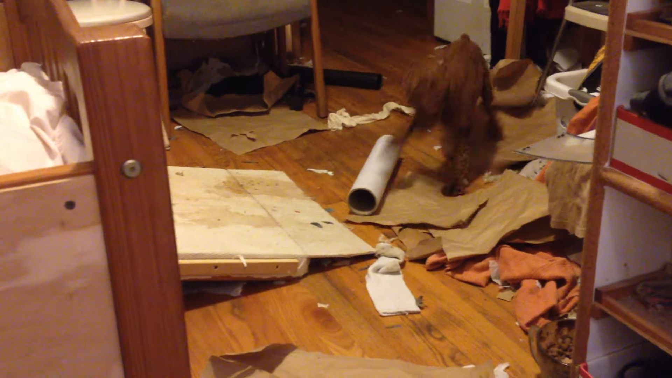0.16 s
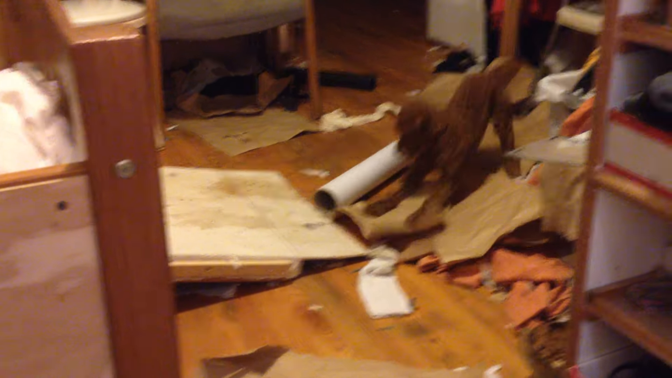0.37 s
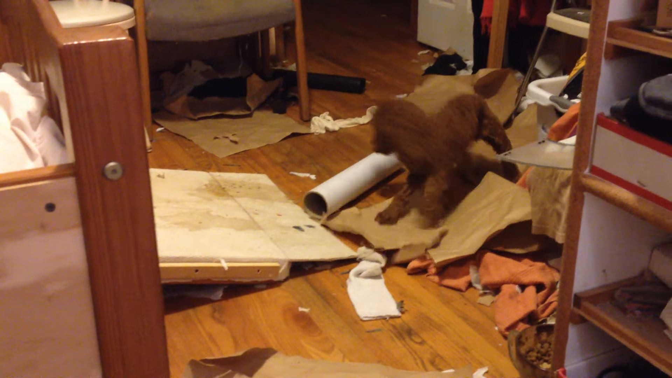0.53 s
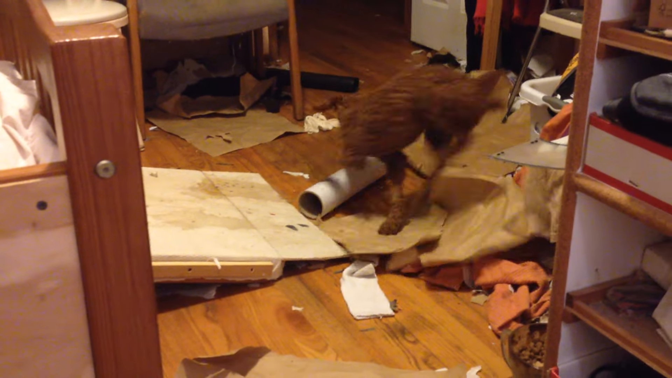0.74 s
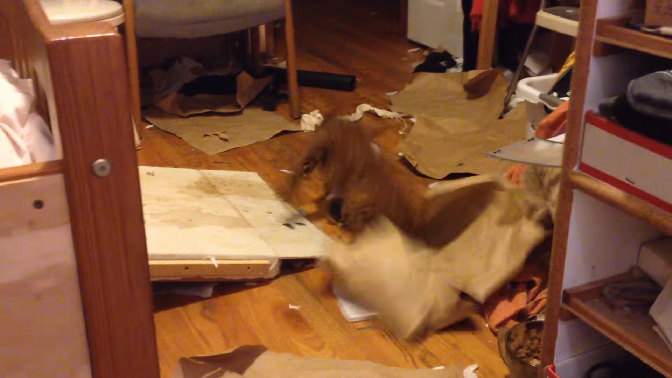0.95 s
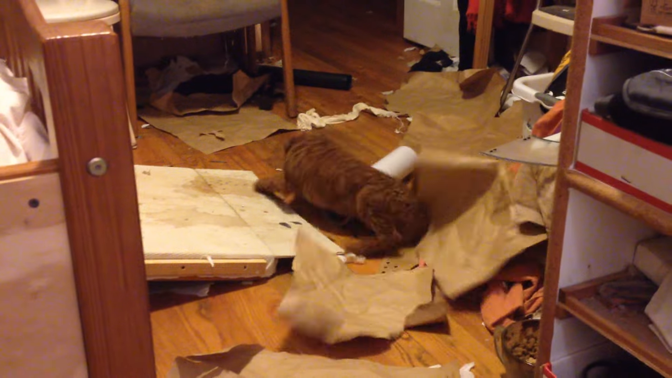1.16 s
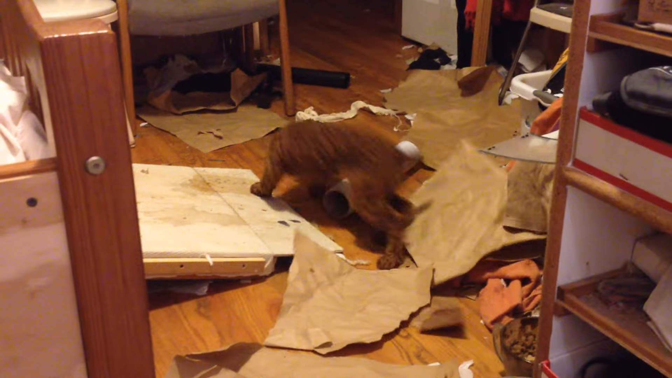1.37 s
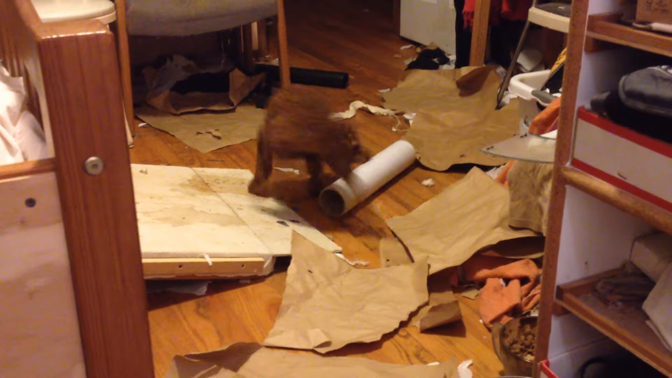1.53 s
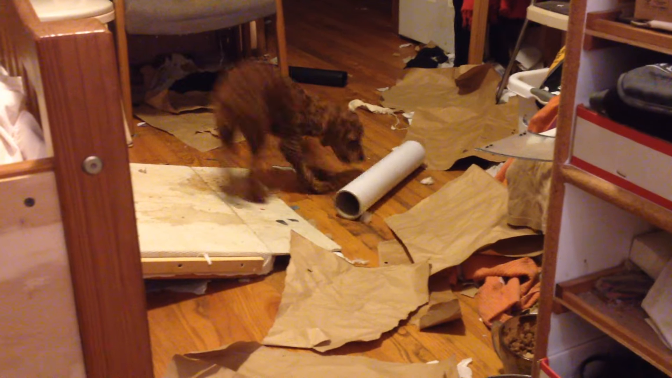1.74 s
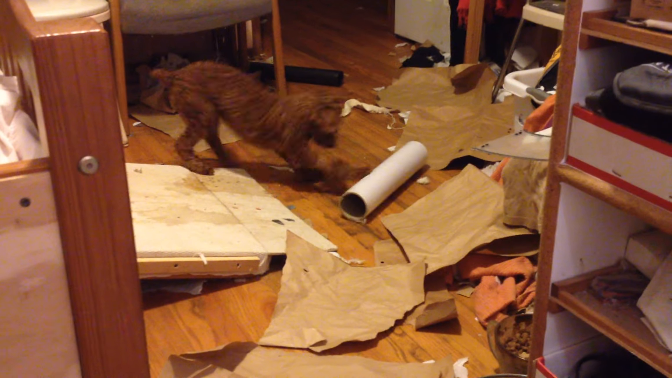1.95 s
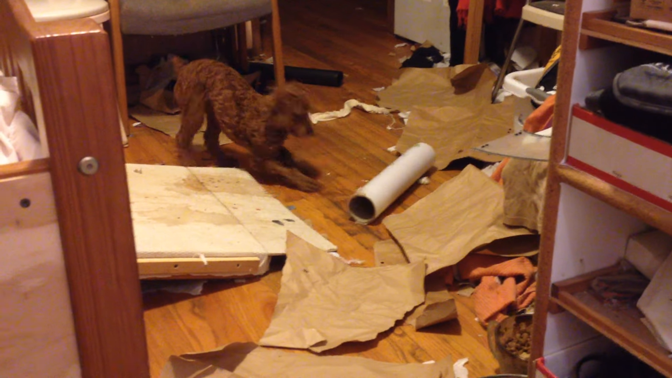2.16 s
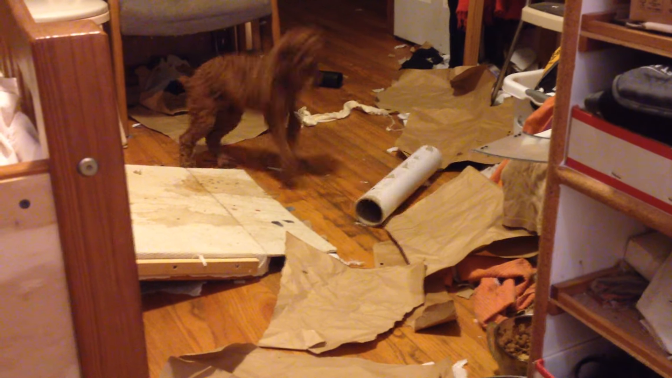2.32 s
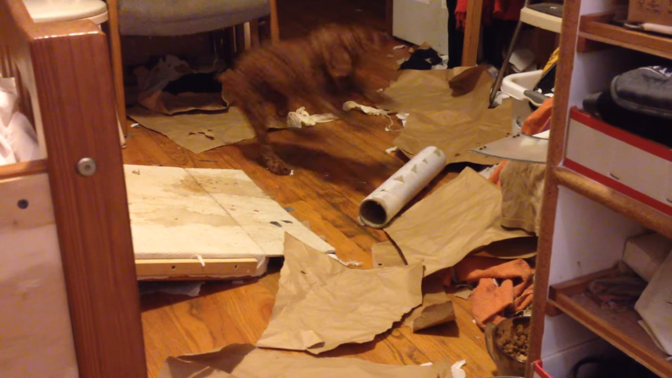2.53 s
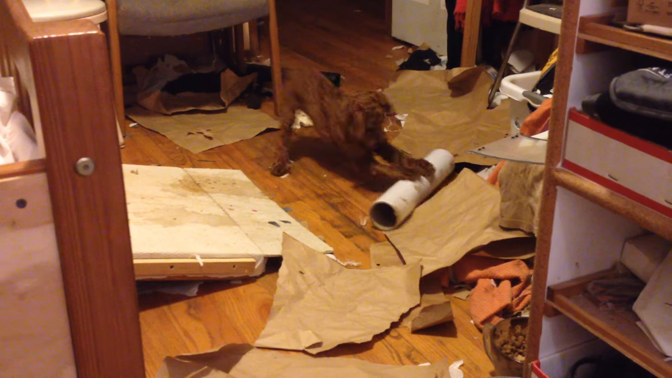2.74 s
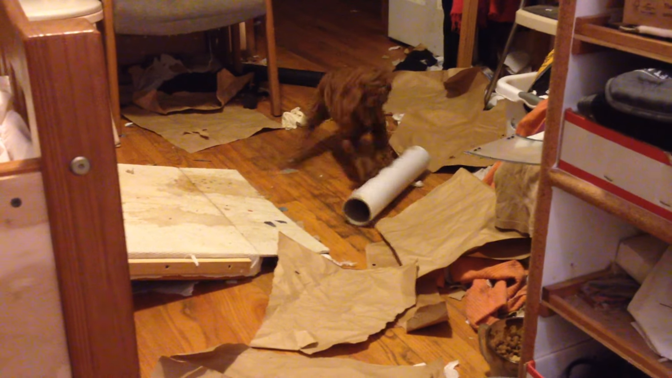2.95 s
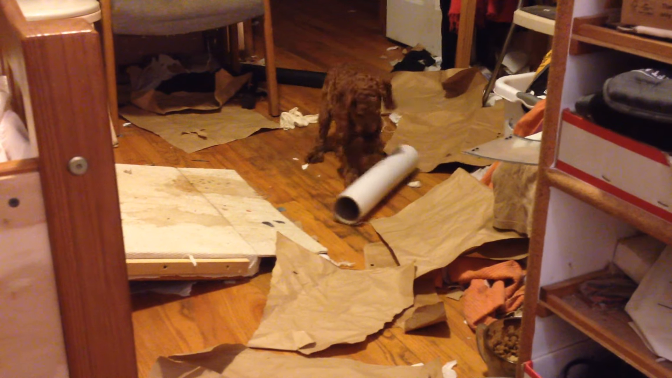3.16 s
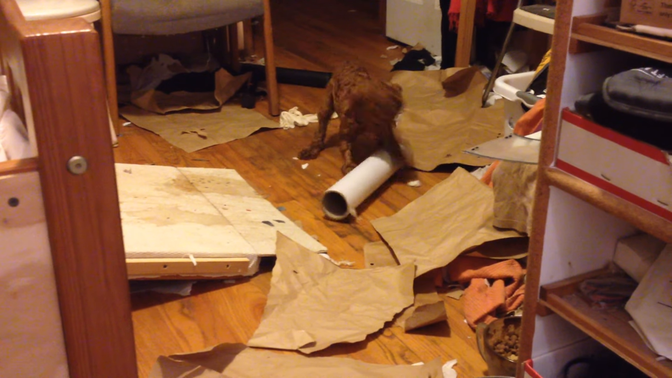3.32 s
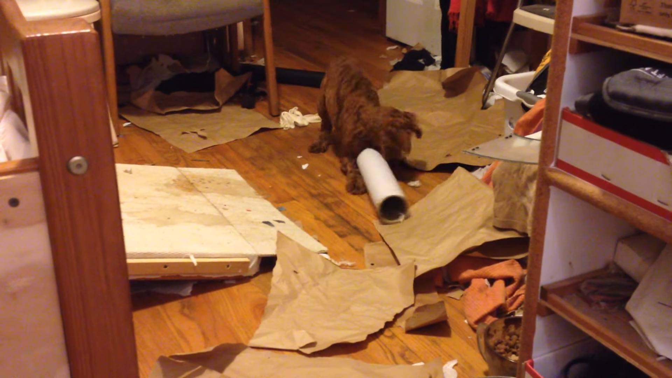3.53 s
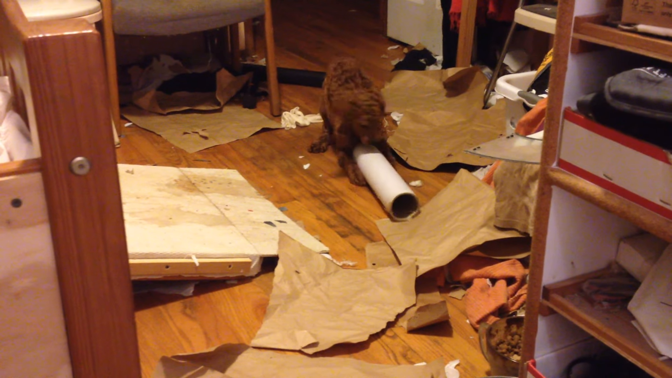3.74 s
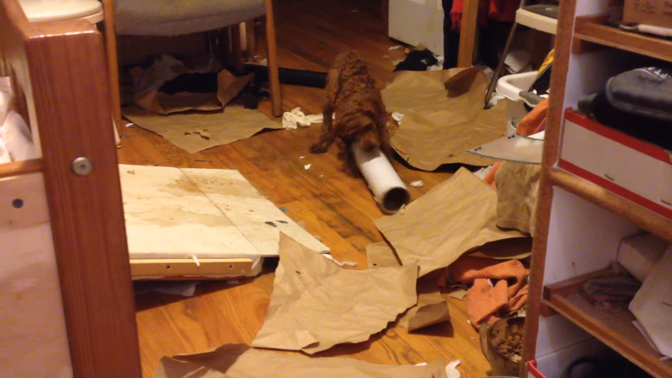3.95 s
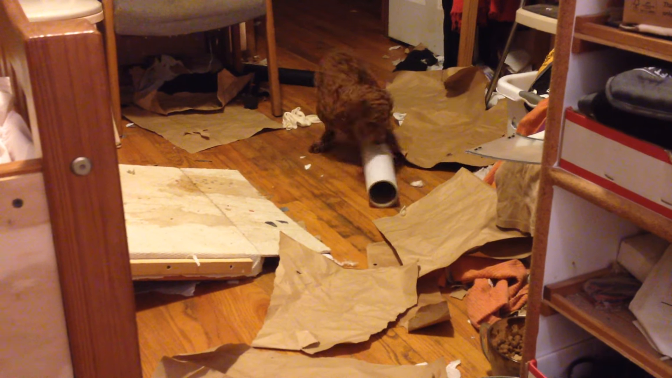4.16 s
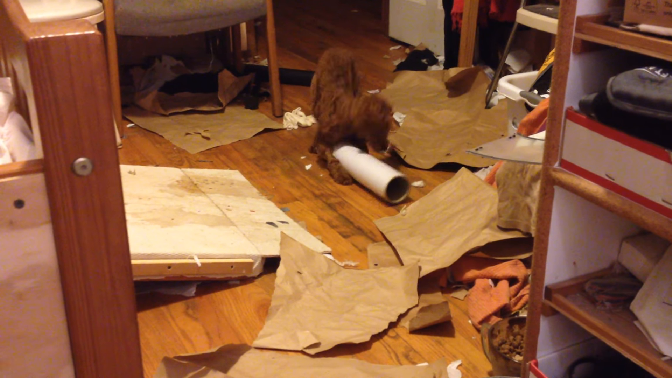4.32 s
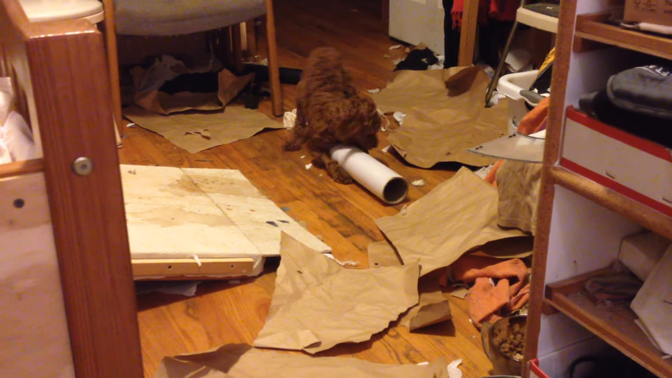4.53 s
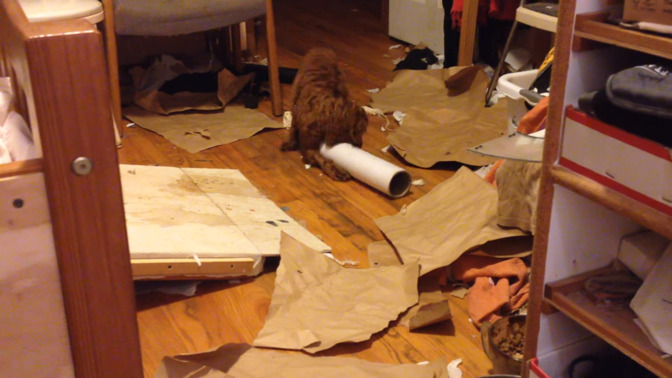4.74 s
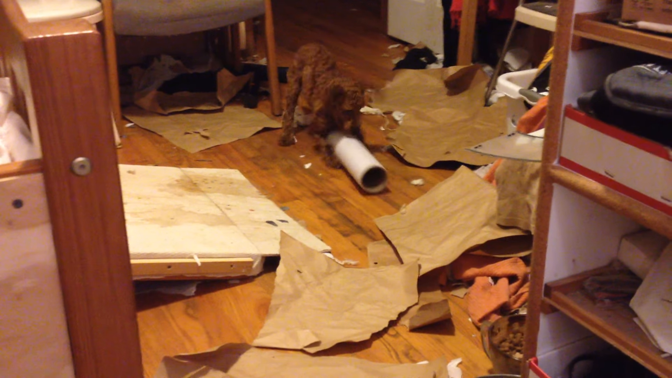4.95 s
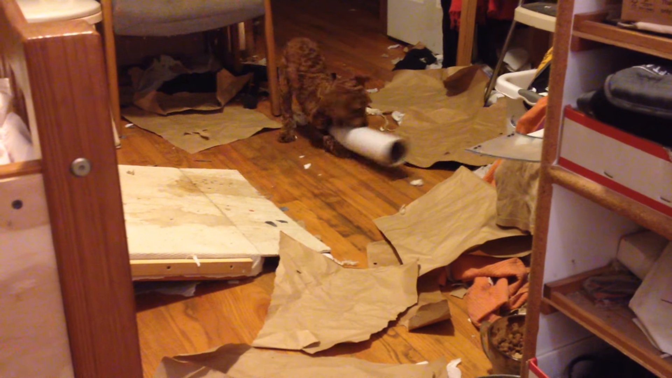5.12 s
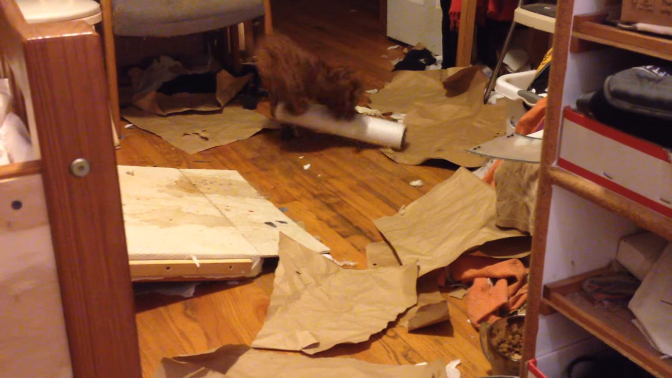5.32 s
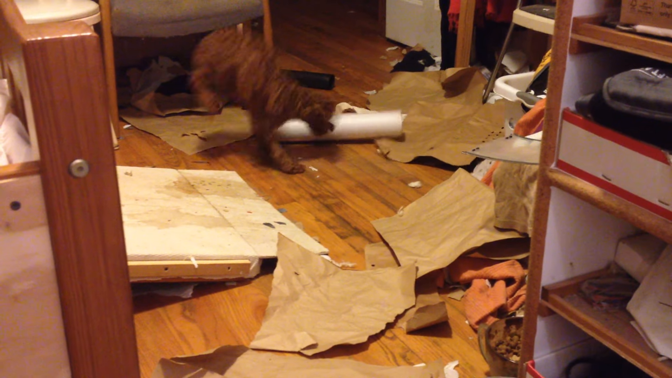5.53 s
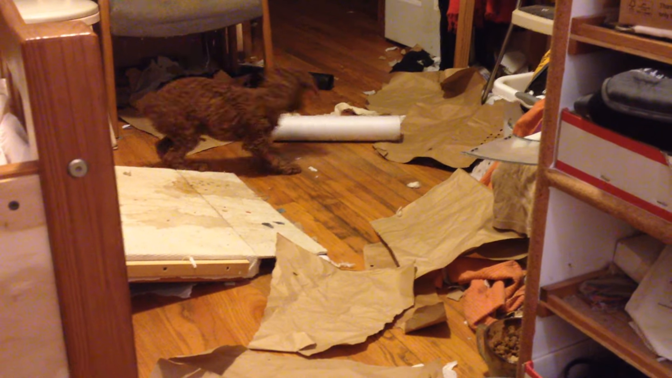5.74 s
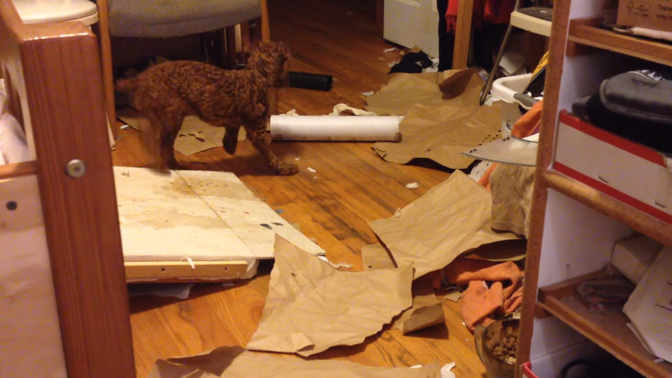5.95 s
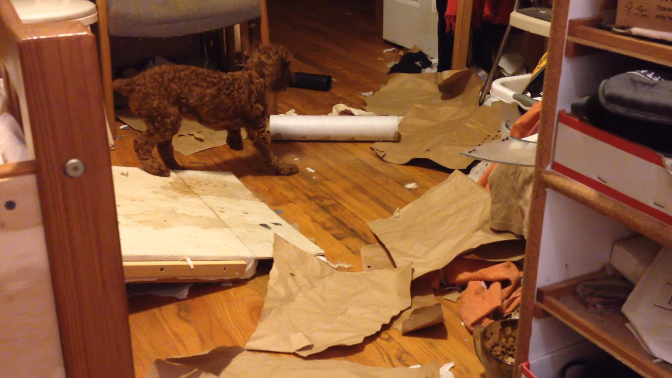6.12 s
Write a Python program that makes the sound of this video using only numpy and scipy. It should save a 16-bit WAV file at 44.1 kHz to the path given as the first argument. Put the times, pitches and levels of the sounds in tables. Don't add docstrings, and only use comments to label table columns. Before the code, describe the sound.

Crisp paper rustling and snapping under paws fades to light ticks, then a cardboard tube bumps, scrapes and finally bangs hard on a wood floor.

```python
import sys
import numpy as np
from scipy import signal
from scipy.fft import rfft, irfft
from scipy.io import wavfile
from scipy.ndimage import uniform_filter1d

SR = 44100
rng = np.random.default_rng(int(sys.argv[2]) if len(sys.argv) > 2 else 0)


def wav_out(sig):
    wavfile.write(sys.argv[1], SR, np.round(np.clip(np.atleast_2d(sig).T, -1, 1) * 32767).astype(np.int16))


def gain_from_db(level_db):
    decades = np.asarray(level_db, float) / 20
    return 10 ** decades


N = 272538
TUBE_FROM_S = 2.6

# hz, level_db (per Hz)
PAPER = [(180, -8), (300, 0), (545, -9), (665, -2), (2230, -4.5), (4470, -5.5), (5100, -9.5), (6650, -4),
         (10800, -7.5), (15700, -12)]
# pitch_hz, level_db, t60_s
BOARDS = [(152.4, -9.5, 0.29), (190, -10, 0.32), (215, -1, 0.12), (250.2, -3.5, 0.2), (290.6, -3.5, 0.22),
          (345, -1.5, 0.11), (420, -8.5, 0.052), (482.8, -10.5, 0.18), (572, -13.5, 0.086)]


def evened(x):
    return x / np.sqrt(np.mean(x ** 2) + 1e-20)


def read(points, hz):
    f, value = np.transpose(points)
    return np.interp(np.log(hz + 1), np.log(f + 1), value)


def add(mix, s, sound):
    part = mix[max(round(s * SR), 0):][:len(sound)]
    part += sound[:len(part)]


def coloured(x, gain_db):
    hz = np.fft.rfftfreq(len(x), 1 / SR)
    return irfft(rfft(x) * gain_from_db(gain_db(hz)), len(x))


def shelves(hz):
    body = 1 / (1 + (hz / 1400) ** 6)
    fizz = 1 / (1 + (5000 / (hz + 1)) ** 5)
    return body, fizz


def hush():
    # hz, level_db (per Hz)
    air_spectrum = [(18, -52), (30, 4), (70, 7), (140, 3), (278, 4), (500, 2.5), (773, -8), (2870, -18),
                    (10300, -22), (14600, -10), (15700, -16)]
    # pitch_hz, level_db (rms)
    hum_tones = [(119, -81)]
    t = np.arange(N) / SR
    air = evened(coloured(rng.standard_normal(N), lambda hz: read(air_spectrum, hz)))
    hum = sum(gain_from_db(db + 6) * np.sin(2 * np.pi * f * t) for f, db in hum_tones)
    return gain_from_db(-72.5) * air + hum


def room(x):
    # hz, t60_s
    room_decay = [(200, 0.38), (1000, 0.12), (3000, 0.11), (8000, 0.22)]
    taps = np.zeros(SR // 2)
    at = np.arange(130, SR // 2 - 20, 20)
    taps[at + rng.integers(0, 20, len(at))] = rng.choice([-1., 1.], len(at))
    hz, t, z = signal.stft(taps, SR, nperseg=256)
    fade = gain_from_db(-60 * t / read(room_decay, hz)[:, None])
    tail = signal.istft(z * fade, SR, nperseg=256)[1]
    return signal.fftconvolve(x, tail / np.linalg.norm(tail))[:N]


def boom(peak_db, hz):
    t = np.arange(12000) / SR
    swell = 1 - np.exp(-t / 0.018)
    return gain_from_db(peak_db + 10.0) * np.sin(2 * np.pi * hz * t) * swell * gain_from_db(-60 * t / 0.42)


def floor_booms(low):
    # start_s, peak_db, pitch_hz
    landings = [
        (1.023, -65, 96.9),
        (1.672, -55, 89),
        (1.766, -73, 98),
        (2.704, -48.5, 105.4),
        (3.417, -49, 50),
        (4.33, -66, 107),
        (5.332, -73, 91.5),
        (5.492, -39, 46),
        (5.651, -38, 45),
        (6.062, -56, 81),
    ]
    for s, peak_db, hz in landings:
        add(low, s - .01, boom(peak_db, hz))


def ring(hz, contact_s, t60):
    t = np.arange(10000) / SR
    slow = evened(uniform_filter1d(rng.standard_normal((2, 201)), size=10))
    feed, sway = (np.interp(t, np.arange(201) * 50 / SR, v) for v in slow)
    free = np.maximum(t - contact_s, 0)
    rise = 1 - np.exp(-(t * hz / 1.2) ** 2)
    swing = np.sin(2 * np.pi * (hz * t + 0.12 * sway))
    return gain_from_db(1.4 * feed - 60 * free / t60) * swing * rise


def rebounds_and_rattles(low):
    # start_s, peak_db, pitch_hz, contact_s
    rebounds_rattles = [(1.044, -21.5, 245.5, 0.014), (1.085, -21, 201, 0.031), (1.005, -33, 204, 0.02),
                        (4.167, -38, 1690, 0.055), (1.233, -33, 230, 0.042), (1.222, -32.5, 482, 0.085),
                        (1.357, -41, 215, 0.045), (3.425, -31, 307, 0.011), (1.714, -31.5, 286, 0.021),
                        (1.73, -35, 500, 0.02), (2.184, -45.5, 464, 0.058), (2.253, -55, 410, 0.025),
                        (2.704, -38.5, 664, 0.019), (2.777, -45.5, 210, 0.045), (3.935, -41, 208, 0.03),
                        (4.169, -20.5, 255, 0.044), (4.164, -28, 345, 0.045), (4.239, -27.5, 221, 0.023),
                        (4.27, -32.5, 248, 0.019), (4.339, -37.5, 760, 0.022), (4.167, -33.5, 760, 0.017),
                        (5.334, -34, 370, 0.044), (5.501, -13.5, 186.5, 0.015), (5.503, -23, 720, 0.016),
                        (5.497, -26, 655, 0.008), (5.646, -29, 790, 0.016), (5.648, -25, 600, 0.03),
                        (5.651, -44, 350, 0.017), (5.695, -25.5, 420, 0.028), (5.498, -28.5, 1880, 0.0057),
                        (0.495, -38, 850, .015), (0.519, -30, 1080, .035), (0.981, -36, 560, 0.041),
               (1.283, -41, 1020, 0.022), (1.32, -42, 482, .035), (1.37, -50, 1030, 0.042),
               (1.655, -46, 740, .025), (1.745, -40, 330, 0.023), (1.745, -44, 640, .025),
               (1.785, -45, 300, .012), (1.805, -49, 1120, .04), (4.175, -33, 520, .03),
               (3.43, -33, 1650, .02), (4.177, -41, 953, 0.018), (4.345, -42.5, 1498, 0.018),
               (5.35, -35, 200, 0.038), (5.507, -17, 245, .012), (5.51, -28.5, 1185, .015),
               (5.576, -33, 280, .01), (5.655, -13.5, 242, .011), (5.675, -23, 360, .02),
               (5.70, -26, 290, .022), (5.70, -35, 1225, .055), (5.738, -38, 1010, .018),
               (5.834, -37.5, 229, 0.023)]
    for s, peak_db, hz, contact_s in rebounds_rattles:
        add(low, s - .004, gain_from_db(peak_db - 4.5) * ring(hz, contact_s, .045))


def thud(peak_db, ring_hz, t60, boards_db, contact_s):
    chance = rng.standard_normal((len(BOARDS), 2))
    rings = ring(ring_hz, contact_s, np.clip(t60, .04, .16))
    for (f, db, decay), (a, b) in zip(BOARDS, chance):
        level = gain_from_db(boards_db + db - 4.5 + 3.07 * a) * np.sign(b)
        rings += level * ring(f * (1 + 0.015 * b), contact_s, decay)
    return gain_from_db(peak_db - 8.0) * rings


def thuds(low):
    # start_s, peak_db, pitch_hz (main ring), boards_db (re main ring)
    paw_thuds = [(0.037, -48, 449, 1), (0.179, -51, 552, -14), (0.364, -37, 345, 2.5),
                 (0.439, -33.5, 245.4, -3), (0.484, -39, 223, 1), (0.761, -41.5, 457, -3),
                 (0.847, -30, 194.5, -10), (0.926, -40.5, 293, 5.5), (1.035, -14, 190, -6),
                 (1.221, -40, 345, 0), (1.501, -54, 238, -1.5), (1.658, -40.5, 596, 5),
                 (1.714, -26.5, 420, -3), (1.944, -43, 223, 2), (2.045, -50, 412, -2),
                 (2.095, -47.5, 241, 3.5), (2.203, -36.5, 468, 0)]
    # start_s, peak_db, pitch_hz (main ring), boards_db (re main ring)
    tube_thuds = [(2.712, -22.5, 215, -15), (3, -41.5, 210, -30), (3.265, -35.5, 209.5, -25),
                  (3.302, -32.5, 200, -23), (3.426, -22, 261.7, -0.5), (3.912, -34, 209, -12),
                  (4.126, -49, 211, 0), (4.166, -25, 300, -1), (4.328, -38, 227, 5.5),
                  (4.536, -48, 165, -10), (4.715, -47, 166, -4), (4.772, -45.5, 244, -22),
                  (5.153, -53, 245, 1), (5.211, -49, 241, -1), (5.266, -49.5, 372, -5),
                  (5.332, -31.5, 240.6, 3.5), (5.405, -31.5, 159, -2.5), (5.498, -14, 288, -2),
                  (5.646, -21, 290, 2), (5.757, -23, 240, -6), (5.909, -34, 463, 2.5),
                  (6.04, -40.5, 215, -7.5)]
    for rows, t60_s, contact_s in ((paw_thuds, 0.16, .026), (tube_thuds, 0.17, .022)):
        for s, peak_db, hz, boards_db in rows:
            add(low, s - .006, thud(peak_db, hz, t60_s, boards_db, contact_s))


def wall(hz):
    # pitch_hz, width_hz, level_db
    wall_modes = [(740, 24, 0.5), (776, 38, -0.5), (1252, 57, -42), (1410, 39, -4), (1670, 62, 4),
                  (1880, 130, -35), (2120, 130, -3.5), (2770, 90, 1), (3760, 24, 3.5)]
    return sum(gain_from_db(db) / (1 + (2 * (hz - f) / w) ** 2) for f, w, db in wall_modes)


def crackle(size, per_s, spread_db):
    struck = rng.random(size) < per_s / SR
    largeness = np.minimum(rng.exponential(1, size), 3)
    sign_noise, slip = rng.standard_normal((2, size))
    clicks = np.sign(sign_noise) * gain_from_db(spread_db * largeness) * struck
    kind = rng.integers(0, 32, size)
    t = np.arange(512) / SR
    out = 0
    for k, hz in enumerate(np.geomspace(500, 13000, num=32)):
        crease = np.sin(2 * np.pi * hz * t) * t * hz * np.exp(-t * hz / 1.6) * (hz / 3000) ** .85
        out = out + signal.oaconvolve(clicks * (kind == k), crease)[:size]
    return evened(out) + .9 * slip


def drag_levels():
    # start_s, effort_db, crispness_db
    paper_drag = [(0.0, -53, -0.5), (0.15, -51, -6.5), (0.26, -45.5, 2.5), (0.6, -47, -5), (0.81, -58, 6),
                  (0.948, -34.5, 1.5), (1.069, -39, -21), (1.15, -56.5, -0.5), (1.29, -53, -0.5),
                  (1.69, -65.5, -1.5), (1.82, -77.5, 1), (2.13, -61.5, -12), (2.53, -80, 4)]
    # start_s, effort_db, crispness_db
    tube_drag = [(2.68, -74.5, -7), (2.74, -62, 2), (2.87, -63, 3.5), (3.1, -64.5, -6), (3.46, -73, 7),
                 (3.6, -64, 1), (3.91, -70, -2.5), (4.23, -56.5, 1), (4.39, -76, -15), (4.51, -74.5, 2.5),
                 (4.97, -67, -2.5), (5.28, -63, -1.5), (5.4, -53.5, 5.5), (5.52, -61.5, 2),
                 (5.68, -60.5, -23), (5.9, -74, -1), (6.18, -80.5, -2.5)]
    s, effort_db, crisp_db = np.transpose(paper_drag + tube_drag)
    extra_db = effort_db + 60
    body_db = -66 + 0.9 * extra_db
    rumble_db = -67 + 0.61 * extra_db
    return s, effort_db, body_db, effort_db + crisp_db, rumble_db


def board_rumble():
    u = np.arange(8000) / SR
    boards = sum(gain_from_db(db - 60 * u / t60) * np.sin(2 * np.pi * f * u) for f, db, t60 in BOARDS)
    pushes = rng.standard_normal(N) * (rng.random(N) < 150 / SR)
    return evened(signal.oaconvolve(pushes, boards)[:N])


def slide():
    s, *levels_db, rumble_db = drag_levels()
    t = np.arange(N) / SR
    hz = np.fft.rfftfreq(N, 1 / SR)
    sheet = rfft(crackle(N, 1500, 1.8)) * gain_from_db(read(PAPER, hz))
    low, high = shelves(hz)
    shared, *own = evened(uniform_filter1d(rng.standard_normal((4, N)), 600))
    rubbing = np.clip((t - TUBE_FROM_S) / 0.086, 0, 1) * np.clip(0.65 + 0.4 * shared, 0, 2)
    out = np.zeros(N)
    for share, db, clumps in zip((1 - low - high, low, high), levels_db, own):
        band = evened(irfft(sheet * share, N))
        band = band + rubbing * irfft(rfft(band) * wall(hz), N)
        out += band * gain_from_db(np.interp(t, s, db) + 0.5 * shared + 0.5 * clumps)
    return out + board_rumble() * gain_from_db(np.interp(t, s, rumble_db))


def burst(creases, s, ring_hz, body_db, fizz_db):
    on_tube = s > TUBE_FROM_S
    hz = np.fft.rfftfreq(8192, 1 / SR)
    low, high = shelves(hz)
    ring_db = (4.0 if on_tube else 7.3) / (1 + ((hz - ring_hz) / 90) ** 2)
    dull_db = 2.2 * on_tube * np.log2(1 + (hz / 9000) ** 4)
    gain = gain_from_db(read(PAPER, hz) + low * (body_db + 5) + high * (fizz_db + 14.0) + ring_db - dull_db)
    piece = creases[rng.integers(len(creases) - 8192):][:8192]
    return evened(irfft(rfft(piece) * gain * (1 + 0.46 * on_tube * wall(hz))))


def with_body(rows, law):
    base_db, per_octave_db, per_blunt_db = law
    touches = []
    for s, db, hz, crisp_db, length_s in rows:
        body_db = base_db + per_octave_db * np.log2(hz / 1000) - per_blunt_db * (crisp_db + 20)
        touches.append((s, db, hz, body_db, crisp_db, length_s))
    return touches


def swish(creases, s, peak_db, ring_hz, body_db, fizz_db, length_s):
    u = 4 * np.arange(8192) / SR / max(length_s, .005)
    return gain_from_db(peak_db - 9) * burst(creases, s, ring_hz, body_db, fizz_db) * u ** 1.6 * np.exp(-u)


def swishes(spots, creases):
    # start_s, peak_db, pitch_hz, crispness_db, length_s
    paper_swishes = [(0.0418, -28.5, 860, -30, 0.049), (0.204, -23, 4550, -17, 0.061),
                     (0.2826, -33, 1420, -15, 0.037), (0.3331, -19.5, 2800, -16, 0.088),
                     (0.673, -31, 4190, -13, 0.048), (0.7538, -21, 1500, -25, 0.085),
                     (0.8713, -18.5, 2000, -16, 0.099), (1.071, -22, 1630, -20, 0.036),
                     (1.192, -25.5, 1610, -22, 0.074), (1.235, -24, 2280, -18.5, 0.032),
                     (1.282, -32, 1020, -38, 0.099), (1.3704, -28.5, 1260, -25, 0.038),
                     (1.573, -45.5, 4540, -13, 0.09), (1.641, -36, 730, -41, 0.11),
                     (1.806, -35, 1160, -15, 0.056), (2.193, -32, 1020, -27, 0.059),
                     (2.2346, -35, 816, -13, 0.031), (2.359, -48, 2440, -9, 0.062),
                     (2.456, -45, 3080, -19, .071), (2.519, -48.5, 4350, -16, 0.052)]
    # start_s, peak_db, pitch_hz, crispness_db, length_s
    tube_swishes = [(2.9703, -35, 1410, -16.5, .073), (3.0186, -34, 2180, -8.5, 0.074),
                    (3.188, -51, 710, -22, .04), (3.5284, -31.5, 685, -16, 0.064),
                    (3.579, -37, 1670, -20, .034), (3.864, -40, 1320, -14.5, 0.055),
                    (4.021, -39.5, 1630, -11, 0.034), (4.0915, -33, 4500, -13.5, 0.11),
                    (4.2, -31, 703, -21, 0.06), (4.2887, -32.5, 2690, -17, 0.11),
                    (4.334, -24.5, 740, -12, 0.043), (4.365, -36, 1500, -22, 0.045),
                    (4.6194, -46, 1400, -54, .04), (4.7142, -44.5, 1780, -18, 0.094),
                    (4.9704, -41, 1660, -15, 0.096), (5.397, -31, 4670, -18, 0.052)]
    # level_db (at 1 kHz), slope_db (per octave), blunt_db (per dB of bluntness)
    paper_law = (-8, -2.3, 0)
    # level_db, slope_db, blunt_db
    tube_law = (-6, -4, 0.24)
    rows = with_body(paper_swishes, paper_law) + with_body(tube_swishes, tube_law)
    for k, row in enumerate(rows):
        add(spots[k % 3], row[0] - .012, swish(creases, *row))


def snap(creases, s, peak_db, ring_hz, body_db, fizz_db, scrape_s):
    on_paper = s < TUBE_FROM_S
    treble_s, pop_level, attack_s = (.087, 2.2, .0012) if on_paper else (.04, 1.1, .00023)
    dull_hz = 3000 if on_paper else 2.1 * ring_hz
    top_db = .3 * (fizz_db + 18) if on_paper else 4.0
    t = np.arange(8192) / SR
    scrape = burst(creases, s, ring_hz, body_db, fizz_db)
    dull = signal.sosfiltfilt(signal.butter(1, dull_hz, fs=SR, output="sos"), scrape)
    scrape = dull + (scrape - dull) * np.exp(-t / treble_s)
    scrape = scrape * gain_from_db(-60 * np.maximum(t - scrape_s, 0) / 0.18)
    tick = coloured(rng.standard_normal(len(t)), lambda hz: read(PAPER, hz) + top_db * shelves(hz)[1])
    tick = .7 * tick * np.exp(-t / .002)
    pop = pop_level * np.sin(2 * np.pi * ring_hz * t) * np.exp(-t / .005)
    return gain_from_db(peak_db - 8.5) * (scrape + tick + pop) * np.clip(t / attack_s, 0, 1)


def snaps_and_knocks(spots, creases):
    # start_s, peak_db, pitch_hz, crispness_db, scrape_s
    paper_snaps = [(0.369, -23, 2150, -34, 0.014), (0.508, -22.5, 3500, -27, 0.028),
                   (0.7695, -25, 3700, -24, 0.008), (0.825, -23, 2464, -17, 0.03),
                   (0.9355, -25, 2080, -30, 0.0068), (1.0423, -26, 2280, -33, 0.016),
                   (1.1514, -36.5, 3000, -14, 0.029), (1.405, -38, 2560, -34, 0.01),
                   (1.656, -45, 2050, -17, 0.019), (1.705, -40.5, 1300, -66, 0.018),
                   (1.935, -48, 1370, -22, 0.015), (2.017, -41.5, 2210, -23, .035),
                   (2.056, -39, 2810, -28, 0.036), (2.0845, -36, 3670, -13, 0.014),
                   (2.1613, -40.5, 4090, -14, .018)]
    # start_s, peak_db, pitch_hz, crispness_db, scrape_s
    tube_knocks = [(2.692, -26.5, 3000, -15, 0.01), (2.865, -36.5, 2900, -10.5, .008),
                   (3.115, -31, 2830, -18.5, 0.025), (3.230, -36.5, 2820, -18.5, 0.0071),
                   (3.4155, -24, 1560, -39, 0.011), (3.9584, -40.5, 2110, -25, 0.01),
                   (4.162, -29, 1660, -43, 0.0038), (4.764, -41, 1440, -14, 0.024),
                   (4.9356, -46.5, 2642, -16, 0.04), (5.202, -41.5, 1670, -40, 0.017),
                   (5.271, -33, 1480, -19.5, 0.026), (5.3183, -30, 2030, -11, 0.021),
                   (5.4905, -20, 1150, -23, 0.02), (5.64, -25, 1540, -25.5, .012),
                   (5.6955, -26, 2900, -23, 0.014), (5.731, -30.5, 3000, -17, 0.008),
                   (5.8905, -42, 1030, -19.5, .009), (6.0294, -52, 963, -47, .012)]
    # level_db (at 1 kHz), slope_db (per octave), blunt_db (per dB of bluntness)
    paper_law = (-7.5, -0.76, 0)
    # level_db, slope_db, blunt_db
    tube_law = (-9.5, -0.66, 0.48)
    rows = with_body(paper_snaps, paper_law) + with_body(tube_knocks, tube_law)
    for k, row in enumerate(rows):
        add(spots[k % 3], row[0] + .003, snap(creases, *row))


def crack(peak_db, hz):
    u = np.arange(600) / SR * hz
    overtone = 0.7 * np.sin(2 * np.pi * 1.76 * u) * np.exp(-u)
    return gain_from_db(peak_db - 6) * (np.sin(2 * np.pi * u) + overtone) * np.exp(-u / 2.5)


def cracks(spots):
    # start_s, peak_db, pitch_hz
    breaks = [(0.207, -26, 2650), (0.232, -27, 3880), (0.287, -25, 4290), (0.344, -23, 2830),
              (0.374, -15, 2250), (0.386, -20, 2200), (0.4, -23, 2250), (0.518, -12, 3370),
              (0.526, -20, 1100), (0.531, -19, 1070), (0.544, -25, 1110), (0.773, -21, 2520),
              (0.834, -15.5, 2500), (0.857, -18, 2020), (0.874, -23, 1960), (0.942, -16, 2400),
              (0.948, -19, 2030), (0.985, -22, 2210), (1.047, -22, 2380), (1.074, -23, 1640),
              (1.199, -30, 2220), (1.211, -27, 1580), (1.336, -32, 2010), (1.371, -35, 2030),
              (1.413, -36, 2520), (1.707, -38, 1230), (3.117, -29, 2780), (4.351, -31, 1440),
              (5.508, -16.5, 1180), (5.698, -23, 1220), (5.734, -28, 1220), (6.033, -53, 1000)]
    for k, (s, peak_db, hz) in enumerate(breaks):
        add(spots[k % 3], s, crack(peak_db, hz))


def scene():
    spots, low = np.zeros((3, N)), np.zeros(N)
    floor_booms(low)
    rebounds_and_rattles(low)
    thuds(low)
    moving = slide()
    creases = crackle(2 * SR, 2000, 1.2)
    swishes(spots, creases)
    snaps_and_knocks(spots, creases)
    cracks(spots)
    near = spots.sum(0) + low + moving
    echoes = gain_from_db(-4.5) * sum(room(spot) for spot in spots)
    echoes = echoes + gain_from_db(-2.5) * room(moving) + gain_from_db(-13) * room(low)
    return np.tile(near + echoes + hush(), (2, 1))


def low_pass(x):
    return signal.sosfilt(signal.butter(12, 15470, fs=SR, output="sos"), x)


def record(dry):
    x = dry + .5 * signal.lfilter(*signal.iirpeak(4600, 9.0, SR), dry)
    x = .3 * x + .7 * signal.lfilter(*signal.iirnotch(5130, 15.0, SR), x)
    x = signal.sosfilt(signal.butter(3, 150, "high", fs=SR, output="sos"), x)
    x = signal.sosfilt(signal.ellip(10, .3, 60, 15350, fs=SR, output="sos"), x)
    return low_pass(x)


dry = scene()
out = record(dry)
wav_out(out)
```